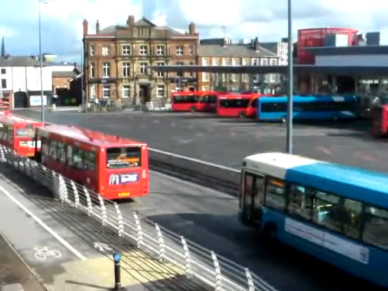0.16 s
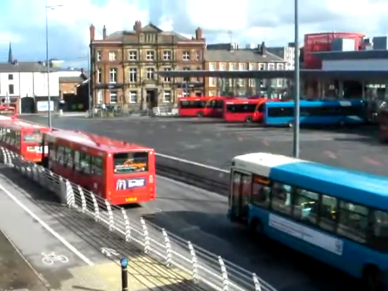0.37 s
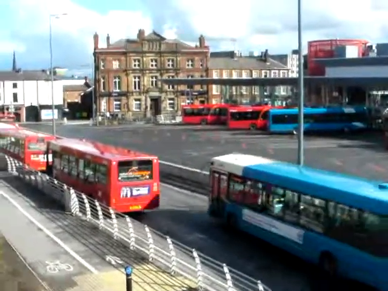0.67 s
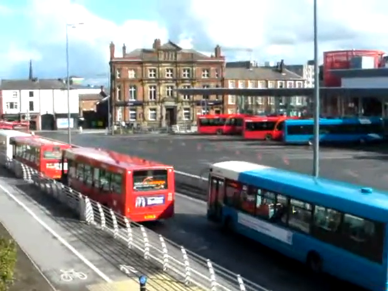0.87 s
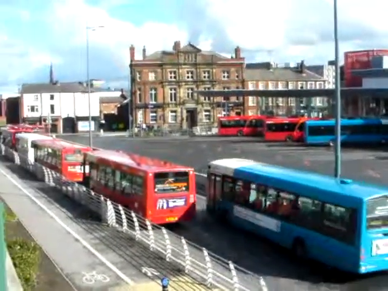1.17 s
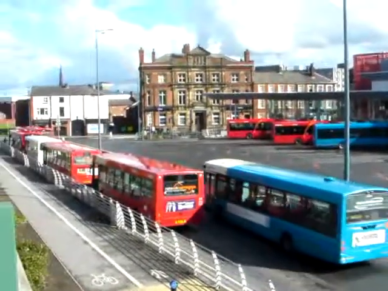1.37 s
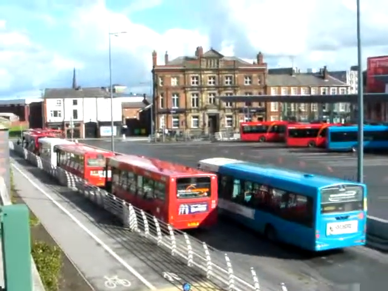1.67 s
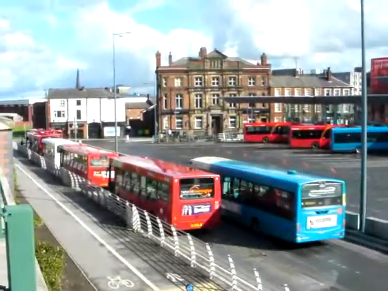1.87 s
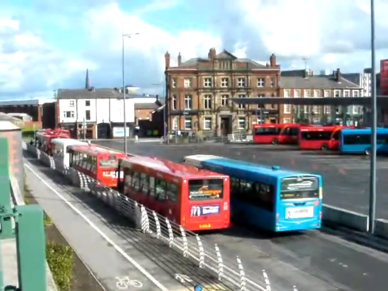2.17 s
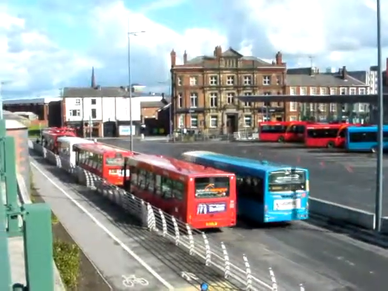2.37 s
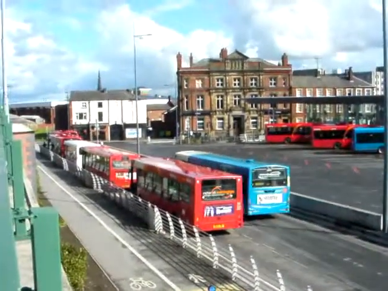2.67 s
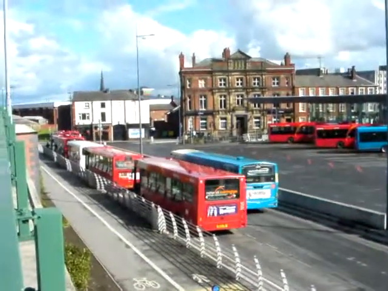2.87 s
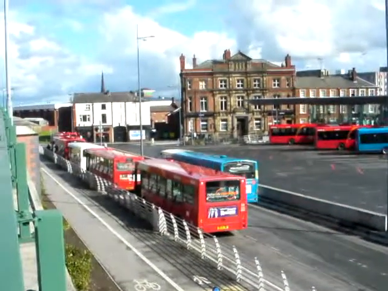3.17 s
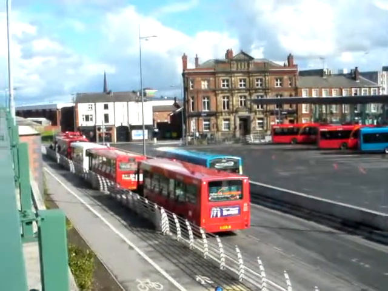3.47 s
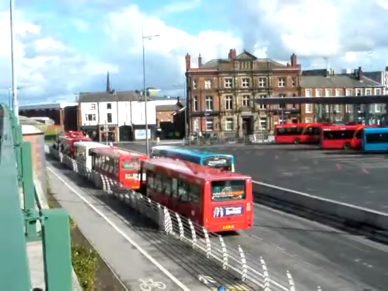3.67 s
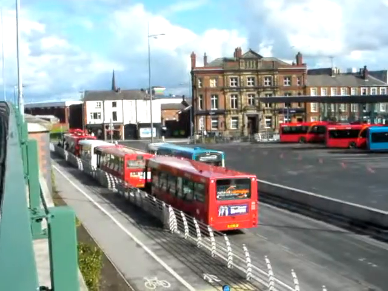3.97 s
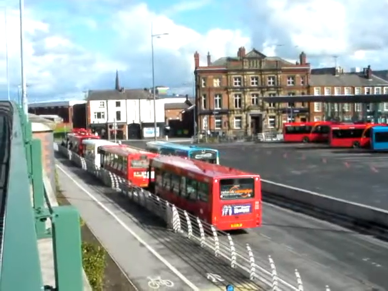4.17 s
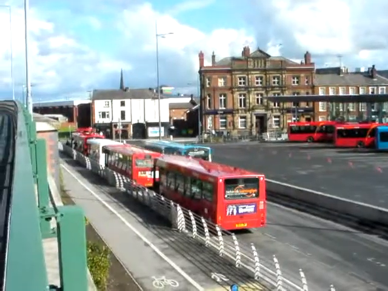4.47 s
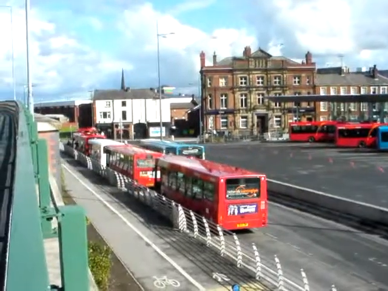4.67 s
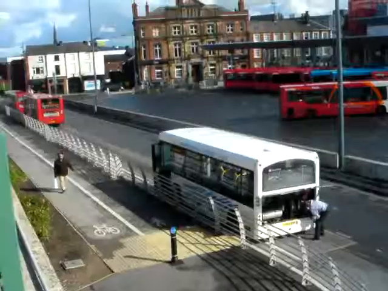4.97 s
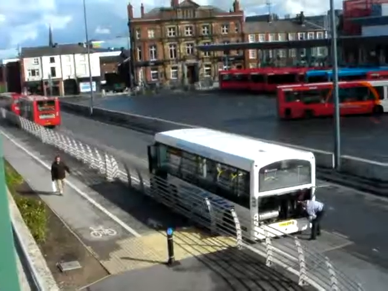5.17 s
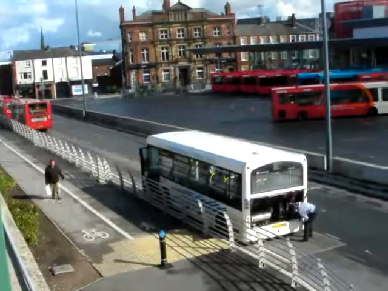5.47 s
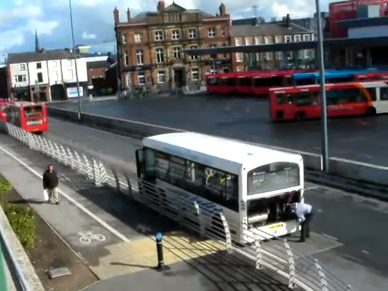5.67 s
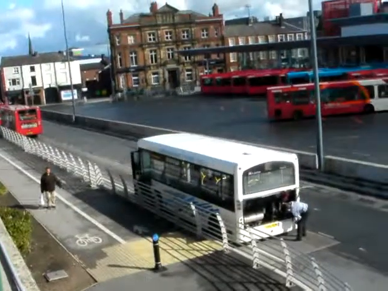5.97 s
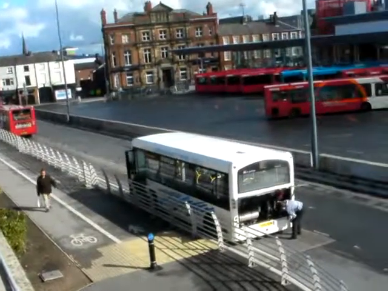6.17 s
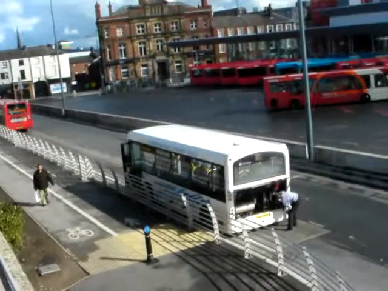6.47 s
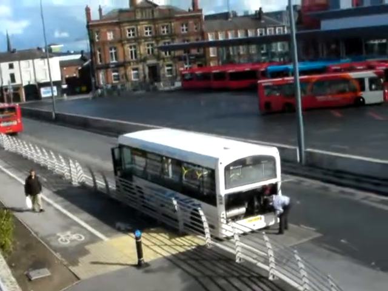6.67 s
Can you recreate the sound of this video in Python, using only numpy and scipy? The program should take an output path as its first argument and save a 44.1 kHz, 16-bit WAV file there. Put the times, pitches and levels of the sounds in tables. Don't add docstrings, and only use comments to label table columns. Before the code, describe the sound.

Outdoors at a bus station, heard from above, a diesel bus passes with a pulsing roar, airy hiss, gear whine and thin squeals. It recedes and dulls into soft traffic hum. A button clicks, and the sound jumps abruptly to a much louder idling diesel close by, knocking and ringing steadily, overloading the small microphone, with a few small rattles.

```python
import sys
import numpy as np
from scipy import signal
from scipy.fft import rfft, irfft, next_fast_len
from scipy.io import wavfile
from scipy.ndimage import uniform_filter1d, minimum_filter1d

SR = 44100
rng = np.random.default_rng(int(sys.argv[2]) if len(sys.argv) > 2 else 0)


def output_pcm(signal):
    pcm = np.clip(np.atleast_2d(signal).T, -1, 1) * 32767
    wavfile.write(sys.argv[1], SR, np.round(pcm).astype(np.int16))


def gain_from_db(level_db):
    decades = np.asarray(level_db, float) / 20
    return 10 ** decades


N = 300762

CHANGE_S = 4.8395
NOTCH_HZ, NOTCH_WIDTH_HZ = 8000, 780
FRAME = 1024

# (frequency [Hz], left-right likeness [0-1], left minus right [dB])
PORTS_FAR = [(60, 0.9, 1.5), (152.6, .985, -0.2), (1210, .99, -0.1), (2360, 0.8, -1.62), (4000, .96, -1.04),
             (6950, .93, 0.72), (9000, 0.9, -12), (13300, 0.6, -3)]
# (frequency [Hz], lead [rad])
LEAD_FAR = [(0, 0), (2400, -.15), (3300, .1), (8000, 0), (8500, -1.1), (9300, -1.1), (10400, 1.4),
            (12700, 1.2), (13800, .6)]


def rms_one(x):
    return x / np.sqrt(np.mean(x ** 2) + 1e-20)


def in_time(rows):
    s, *columns = np.transpose(rows)
    return [np.interp(np.arange(N) / SR, s, c) for c in columns]


def at_hz(points, hz, column=1):
    points = np.array(points)
    return np.interp(np.log(hz + 1), np.log(points[:, 0] + 1), points[:, column])


def drift(rate_hz, size):
    r = np.exp(-80 * np.pi * rate_hz / SR)
    noise = rng.standard_normal(size // 40 + 2002)
    slow = signal.lfilter([1], [1, -2 * r, r * r], noise)[2000:]
    return np.interp(np.arange(size) / 40, np.arange(len(slow)), rms_one(slow))


def firing_gate(hz, sharp, uneven_db):
    cylinder_db = [-1.5, -0.5, -2, 0.5, -4, -0.8]
    turns = np.cumsum(hz * (1 + 0.0096 * drift(4.7, N))) / SR
    shot = turns.astype(int)
    strength_db = np.array(cylinder_db)[shot % 6] + uneven_db * rng.standard_normal(2000)[shot]
    puff = gain_from_db(strength_db) * np.exp(-sharp * (turns - shot))
    return rms_one(uniform_filter1d(puff, size=60))


def roar(spectrum, low_hz, high_hz, span, ports, lead, patchy_db, band_db=None):
    length = span.stop - span.start
    size = next_fast_len(length)
    hz = np.arange(size // 2 + 1) * SR / size
    near, other = rfft(rng.standard_normal((2, size)))
    alike = np.clip(at_hz(ports, hz), 0, 1)
    lag = np.exp(-1j * np.interp(hz, *np.transpose(lead)))
    right = alike * lag * near + np.sqrt(1 - alike ** 2) * other
    pan = gain_from_db(at_hz(ports, hz, column=2) / 2)

    off = ((hz - NOTCH_HZ) / NOTCH_WIDTH_HZ) ** 2
    notch = (off + 0.015) / (1 + off)
    colour = gain_from_db(at_hz(spectrum, hz)) * notch * (hz > low_hz) * (hz < high_hz)
    both = np.array([near * pan, right / pan]) * colour
    both /= np.sqrt(np.mean(irfft(both.mean(axis=0), size) ** 2))

    out = np.zeros((2, N))
    together = drift(14, size)
    third = 3 * np.log2(np.maximum(hz, 50) / 50)
    for k in range(int(third[hz > low_hz][0]), int(third[hz < high_hz][-1]) + 2):
        window = np.cos(np.pi / 2 * np.clip(third - k, -1, 1)) ** 2
        gain_db = (patchy_db * (0.7 * together + drift(11, size)))[:length]
        if band_db is not None:
            gain_db = gain_db + band_db(50 * 2 ** (k / 3))[span]
        out[:, span] += gain_from_db(gain_db) * irfft(both * window, size)[:, :length]
    return out


def tone(rows, wobble_db, blur_rad=.3, blur_hz=8):
    hz, level_db = in_time(rows)
    t = np.arange(N) / SR
    fade = np.clip(np.minimum(t - rows[0][0], rows[-1][0] - t) / .05, 0, 1)
    phase = 2 * np.pi * np.cumsum(hz) / SR + blur_rad * drift(blur_hz, N)
    return np.sqrt(2) * fade * gain_from_db(level_db + wobble_db * drift(blur_hz, N)) * np.sin(phase)


def departing_bus(span):
    # (time [s], level [dB], air loss at 5 kHz [dB], hiss [dB])
    course = [(0.0, -19, -1.5, -30), (0.26, -18.5, -4.5, -32), (1.37, -18.5, -3, -31.5),
              (2.19, -21, -4, -36.5), (2.41, -22.5, -2.5, -35), (2.59, -22, -2, -34), (2.88, -25, 1, -38.5),
              (3.25, -24.5, -6, -43), (3.4, -30, 1.5, -42.5), (3.48, -25.5, -3.5, -44),
              (3.61, -28.5, -3, -44), (3.69, -35.5, 4, -47), (3.75, -26, -8.5, -47), (3.91, -36, 0, -51),
              (3.95, -29, -9, -49), (4.04, -35.5, -5.5, -54.5), (4.29, -37, -8, -55),
              (4.37, -37.5, -10, -62), (4.42, -30.5, -13, -56), (4.5, -36.5, -11.5, -62),
              (4.52, -30.5, -17.5, -62), (4.68, -34, -18, -65)]
    # (frequency [Hz], density [dB/Hz])
    roar_shape = [(24, -72), (40, -56), (109, -14.5), (202, -12.5), (309, -7.5), (374, -10.5), (435, -4.5),
                  (561, -4), (1400, -4.5), (1970, -9), (2550, -5), (3360, -12.5), (3980, -12),
                  (6500, -16.5), (8450, -27.5), (14300, -120)]
    # (frequency [Hz], density [dB/Hz])
    hiss_shape = [(5290, -37), (9000, -6), (10100, -6), (11100, -1.5), (13500, -1)]
    # (time [s], frequency [Hz], level [dB])
    firing = [(0.0, 116.5, -48), (0.09, 115.1, -51.5), (0.55, 114.9, -42.5), (0.84, 116.5, -48.5),
              (0.97, 118.1, -37), (1.76, 124.4, -45.5), (2.55, 126.2, -40.5), (2.6, 125.8, -60),
              (2.9, 127.3, -44.5), (3.3, 122.1, -51.5)]
    level_db, loss_db, hiss_db = in_time(course)
    gate = firing_gate(in_time(firing)[0], sharp=0.99, uneven_db=1.44)

    def dulled(hz):
        return (loss_db + 7) * np.clip(np.log2(hz / 900) / 2.57, 0, 1.3)

    def hiss_tilt(hz):
        return (hiss_db + 29.5) * 1.2 * np.log2(hz / 10000)

    body = roar(roar_shape[:-1], 20, NOTCH_HZ, span, PORTS_FAR, LEAD_FAR, .45, dulled)
    hiss = roar(hiss_shape[1:-1], NOTCH_HZ, 13750, span, PORTS_FAR, LEAD_FAR, .7, hiss_tilt)
    body = gain_from_db(level_db + 1.07) * (0.59 + .4 * gate) * body
    hiss = gain_from_db(hiss_db + 3) * (.7 + 0.35 * gate) * hiss
    return body + hiss + tone(firing, wobble_db=2.5)


def gear_whines():
    # (time [s], frequency [Hz], level [dB])
    whines = [
        [(0.9, 427, -36), (0.97, 434, -26), (1.0, 428.6, -40), (1.33, 434.9, -23), (1.43, 428.7, -32),
         (1.55, 438, -26.5), (2.02, 435.7, -27.5), (2.09, 434.4, -33), (2.14, 432.7, -22), (2.4, 426.5, -31.5),
         (2.55, 428.0, -24.5), (2.64, 432.7, -43), (2.95, 417, -34), (3.05, 440.1, -46)],
        [(0.1, 1443, -39), (0.284, 1400, -22), (0.348, 1423, -34), (0.576, 1444, -23), (0.85, 1458, -44)],
        [(2.15, 1575, -33), (2.29, 1598, -28), (2.36, 1582, -50), (2.44, 1590, -29), (2.85, 1587, -39)],
        [(5.88, 5153, -66), (5.9, 5103, -44), (6.038, 5023, -44.5), (6.1, 5091, -62)],
        [(5.85, 262.0, -43), (5.98, 280.4, -21), (6.102, 267.7, -44), (6.342, 287.5, -26), (6.5, 268.5, -34)],
    ]
    return gain_from_db(-1.5) * sum(tone(rows, wobble_db=1.5, blur_rad=0.48) for rows in whines)


def squeals():
    # (time [s], frequency [Hz], level [dB])
    squeal_rows = [
        [(2.3, 3890, -33), (2.446, 3866, -35), (2.52, 3854, -29.5), (2.63, 3920, -32), (2.646, 3915, -28),
         (2.726, 3890, -37), (2.864, 3840, -27.5), (3.16, 3770, -40), (3.532, 3720, -31), (3.616, 3680, -39),
         (3.8, 3830, -43)],
        [(0.0, 2586, -26), (0.46, 2550, -26.5), (0.49, 2556, -28), (1.06, 2517, -24), (1.39, 2540, -23.5),
         (1.71, 2536, -29), (1.91, 2572, -26), (1.95, 2550, -34), (2.29, 2515, -29), (2.32, 2500, -33),
         (2.6, 2505, -33)],
        [(0.6, 2806, -30.5), (1.2, 2806, -26), (1.27, 2807, -33), (1.41, 2805, -26), (1.65, 2810, -33),
         (1.78, 2810, -27), (2.21, 2780, -37), (2.27, 2790, -31), (2.33, 2810, -37), (2.79, 2810, -28),
         (3.0, 2780, -36)],
        [(0.0, 1407, -31), (0.304, 1410, -22), (0.35, 1410, -31), (0.616, 1410, -24), (0.786, 1404, -31),
         (0.836, 1408, -27), (0.972, 1398, -31.5), (1.688, 1410, -26.5), (1.8, 1397, -32)],
        [(5.7, 5040, -43), (5.824, 4950, -38), (6.052, 5020, -38), (6.126, 4890, -44), (6.138, 4895, -36),
         (6.15, 4890, -41)],
    ]
    mono = sum(tone(rows, wobble_db=2.0, blur_rad=1.4, blur_hz=40) for rows in squeal_rows)
    return mono * gain_from_db([[-7], [-4.5]])


def idling_bus(span):
    # (time [s], level [dB], 3-7 kHz rattle against it [dB], hiss [dB], bay resonance [Hz])
    course = [(4.85, -12.5, -27, -62, 1071), (4.892, -12, -31, -59, 1054), (4.98, -12, -26, -65, 1030),
              (5.002, -12.5, -27, -56, 1018), (5.036, -10.5, -29, -61, 992.4),
              (5.172, -11.5, -28.5, -56, 1019), (5.184, -11, -28.5, -61, 1020),
              (5.386, -11.5, -29.5, -54.5, 1011), (5.876, -9.5, -26.5, -53, 973.3),
              (6.226, -11, -26, -53.5, 1029), (6.304, -10.5, -24, -50.5, 1090),
              (6.786, -11, -26, -52, 1090), (6.82, -10, -24, -44, 1120)]
    # (frequency [Hz], density [dB/Hz])
    knock_shape = [(24, -84), (40, -58), (109, -23), (147, -22.5), (278, -8), (399, -10.5), (1060, -1),
                   (1340, -5), (1700, -4.5), (2240, -11.5), (2660, -20.5), (3740, -29.5), (5030, -31),
                   (6500, -39), (8450, -69), (14300, -120)]
    # (frequency [Hz], density [dB/Hz])
    hiss_shape = [(5290, -34), (9000, -8), (9920, -4.5), (12000, -5), (15600, -38), (22000, -120)]
    # (frequency [Hz], left-right likeness [0-1], left minus right [dB])
    ports_near = [(60, 0.87, .5), (200, .99, 0.36), (1300, .992, 0.67), (2900, .95, 0), (5000, 0.65, -0.53),
                  (8000, 0.49, .4), (12000, 0.47, 1)]
    # (frequency [Hz], lead [rad])
    lead_near = [(0, 0), (2400, -.06), (4400, .2), (5300, -.1), (8600, .2), (10500, 2.5), (12500, 3.1)]
    level_db, rattle_db, hiss_db, _ = in_time(course)
    gate = firing_gate(58.44, sharp=1.0, uneven_db=1.3)

    def rattling(hz):
        return (rattle_db + 27.5) * np.clip(np.log2(hz / 2000), 0, 1)

    body = roar(knock_shape[:-1], 20, NOTCH_HZ, span, ports_near, lead_near, .45, rattling)
    hiss = roar(hiss_shape[1:-1], NOTCH_HZ, 12900, span, ports_near, lead_near, .6)
    bay_rows = [(s, hz, -7.5) for s, *_, hz in course]
    bay = tone(bay_rows, wobble_db=3.0, blur_rad=1.8, blur_hz=70)
    knock = gain_from_db(level_db - 1.14) * (0.76 + .25 * gate) * (body + bay)
    return knock + gain_from_db(hiss_db + 1.5) * (0.89 + .15 * gate) * hiss


def ticks():
    # (time [s], frequency [Hz], level [dB], t60 [s])
    hits = [
        (4.7226, 2200, -3.5, 0.0064),
        (5.9, 4000, -9, .003),
        (4.7242, 1150, -9.5, 0.029),
        (4.712, 40, -48, .1),
        (4.8432, 1577, -6, 0.04),
        (5.771, 5500, -24, .006),
        (5.776, 11000, -32, 0.0078),
        (5.802, 4500, -24, .012),
        (5.85, 3800, -22, .008),
    ]
    t = np.arange(N) / SR
    out = np.zeros(N)
    for s, hz, level_db, t60_s in hits:
        decay = gain_from_db(level_db - 60 * np.clip(t - s, 0, 1) / t60_s)
        out += decay * -np.sin(2 * np.pi * hz * (t - s)) * (t > s)
    return out


def change_tick():
    t = np.arange(N) / SR - CHANGE_S
    return gain_from_db(-9) * np.exp(-(t / .00005) ** 2) * np.cos(2 * np.pi * 9500 * t)


def traffic(span):
    # (frequency [Hz], density [dB/Hz])
    hum_shape = [(24, -75), (40, -54), (124, -17), (147, -11.5), (359, -7), (505, -3.5), (638, -5),
                 (1060, -3), (1290, -6.5), (1890, -7.5), (2710, -14.5), (3900, -22), (6500, -30.5),
                 (8450, -39), (14300, -120)]
    return gain_from_db(-24) * roar(hum_shape[:-1], 20, NOTCH_HZ, span, PORTS_FAR, LEAD_FAR, 0.74)


def in_frames(x, grid, change):
    n = np.arange(2 * FRAME)
    window = np.sin(np.pi * (n + .5) / (2 * FRAME))
    cosines = np.cos(np.pi / FRAME * np.outer(n + .5 + FRAME / 2, n[:FRAME] + .5))
    basis = window[:, None] * cosines
    pair = np.array([x[0] + x[1], x[0] - x[1]]) / 2
    pair = np.pad(pair, [(0, 0), (2 * FRAME - grid, 3 * FRAME)])
    starts = np.arange(0, pair.shape[1] - 2 * FRAME, FRAME)
    count = len(starts)
    bands = (pair[:, starts[:, None] + n] @ basis / FRAME).reshape(2, count, -1, 16)
    level_db = 10 * np.log10(np.mean(bands ** 2, axis=3) + 1e-20)
    centre_hz = (np.arange(FRAME // 16) + .5) * 8 * SR / FRAME
    frames = 2 * change(bands, level_db, centre_hz).reshape(2, count, -1) @ basis.T
    out = np.zeros_like(pair)
    for half in (0, FRAME):
        out[:, half:half + count * FRAME] += frames[:, :, half:half + FRAME].reshape(2, -1)
    mid, side = out[:, 2 * FRAME - grid:][:, :N]
    return np.array([mid + side, mid - side])


def echo_flecks(bands, level_db, hz):
    # (frequency [Hz], step [dB])
    step_db = [(100, -8), (1000, 0), (4000, 2.5), (12000, 1)]
    # (frequency [Hz], depth [dB])
    fleck_db = [(100, 1.0), (1000, 1.8), (2500, 2.2), (4000, 2.9), (14000, 3.1)]
    patches = rng.standard_normal((bands.shape[1], FRAME))
    patches = uniform_filter1d(patches, size=2, axis=0)
    patches = uniform_filter1d(patches, size=4, axis=1)
    patches = rms_one(patches).reshape(bands.shape[1:]) - 0.32
    floor_db = minimum_filter1d(level_db, size=3, axis=1)
    step = gain_from_db(floor_db + at_hz(step_db, hz))[..., None]
    return step * np.round(bands * gain_from_db(at_hz(fleck_db, hz)[:, None] * patches) / step)


def masked_bands(bands, level_db, hz):
    band_edges_hz = np.append(np.arange(0, 3000, 375), np.arange(3000, 22000, 750))
    # (frequency [Hz], level [dB])
    quiet_db = [(7000, -99), (10900, -99), (11600, -87), (12400, -76), (13100, -66), (13900, -45)]
    # (frequency [Hz], side over mid [dB])
    side_mask_db = [(100, -23.5), (1000, -22), (2500, -22), (4000, -15), (7000, -13), (9000, -25)]
    lines = bands.reshape(2, -1, FRAME)
    edges = np.round(band_edges_hz * 2 * FRAME / SR).astype(int)
    widths = np.diff(edges, append=FRAME)
    power = np.add.reduceat(lines ** 2, edges, axis=2) / widths + 1e-20
    level_db = 10 * np.log10(power)
    hz = (edges + widths / 2) * SR / FRAME / 2
    short_db = 3.0 * rng.standard_normal((lines.shape[1], 1))
    around_db = 10 * np.log10(uniform_filter1d(power[0], size=7, axis=1))
    around_db = around_db - 99 * (hz < 6000)
    heard = level_db > at_hz(quiet_db, hz) + short_db / 2
    heard &= level_db > around_db - 16.5 + short_db / 2
    heard[1] &= level_db[1] > level_db[0] + at_hz(side_mask_db, hz) + short_db
    return (lines * np.repeat(heard, widths, axis=2)).reshape(bands.shape)


def scene():
    cut = round(CHANGE_S * SR)
    before, after = slice(0, cut), slice(cut, N)
    station = departing_bus(before) + squeals() + idling_bus(after) + traffic(before)
    gain = gain_from_db(12 * (np.arange(N) >= cut))
    flecked = gain * in_frames(station / gain, 600, echo_flecks)
    return flecked + gear_whines() + ticks() + change_tick()


def band_limit(x):
    return signal.sosfilt(signal.butter(12, 14190, fs=SR, output="sos"), x)


def record(dry):
    full_scale = .97
    cut = signal.sosfilt(signal.butter(2, 75, "high", fs=SR, output="sos"), dry)
    clipped = np.clip(cut, -full_scale, full_scale) / full_scale
    return band_limit(in_frames(clipped, 145, masked_bands))


dry = scene()
out = record(dry)
output_pcm(out)
```